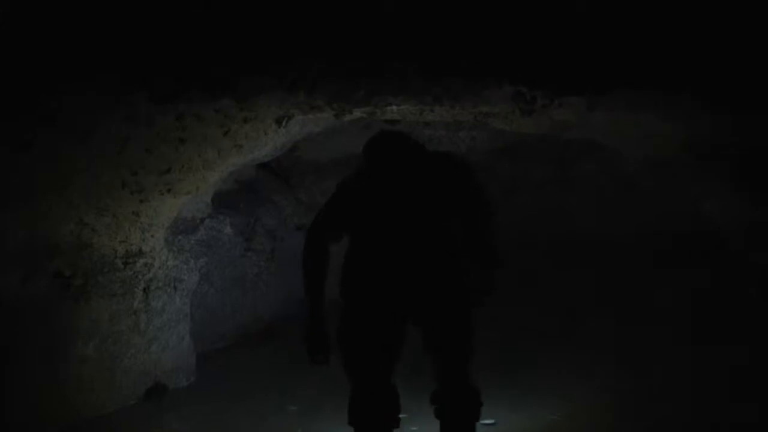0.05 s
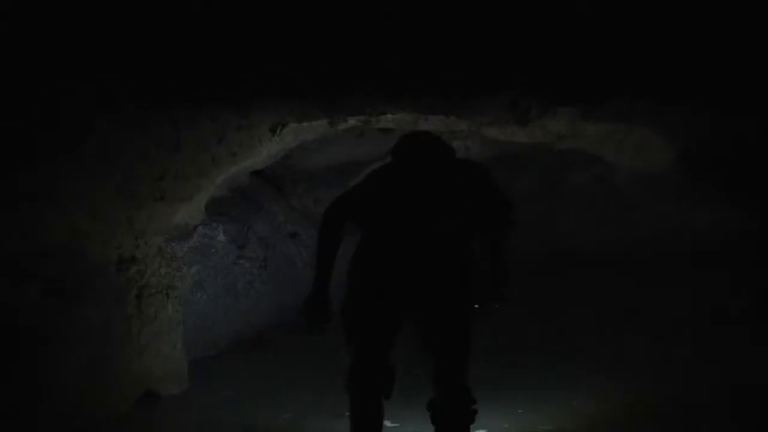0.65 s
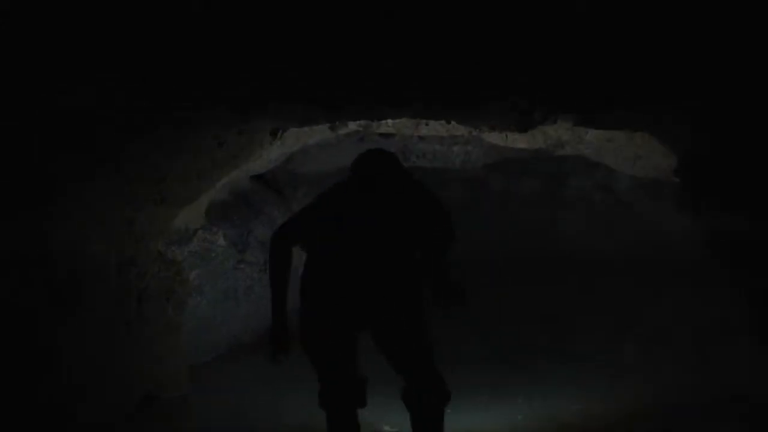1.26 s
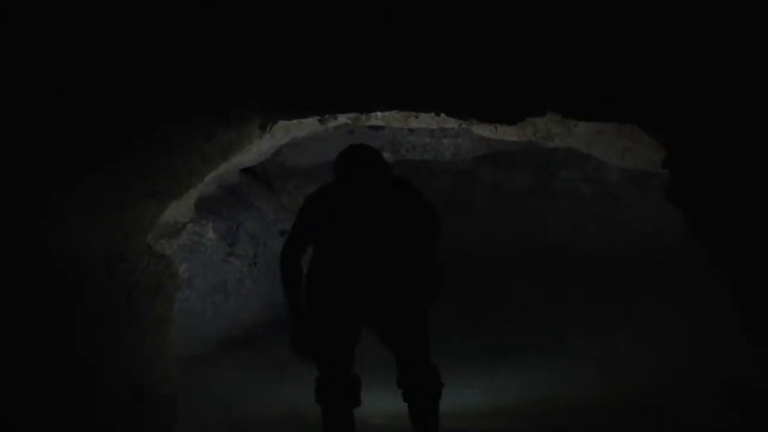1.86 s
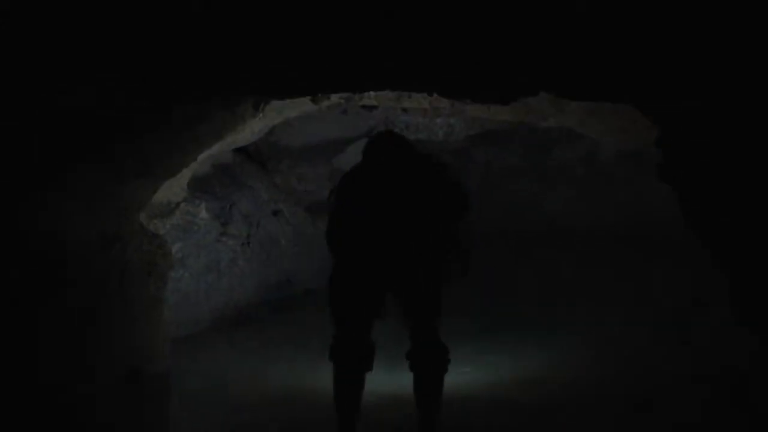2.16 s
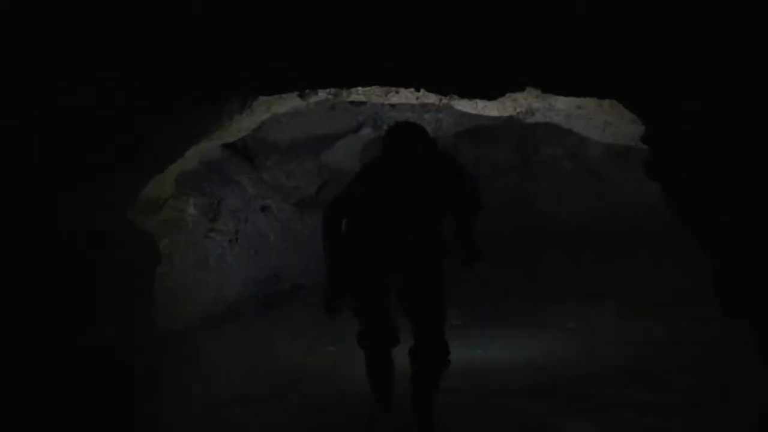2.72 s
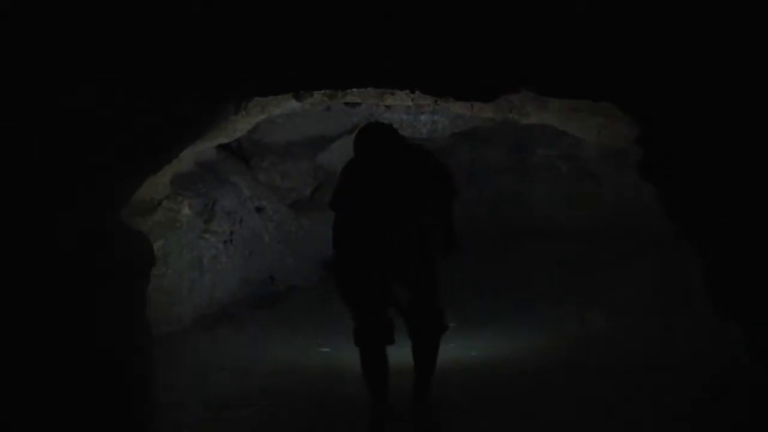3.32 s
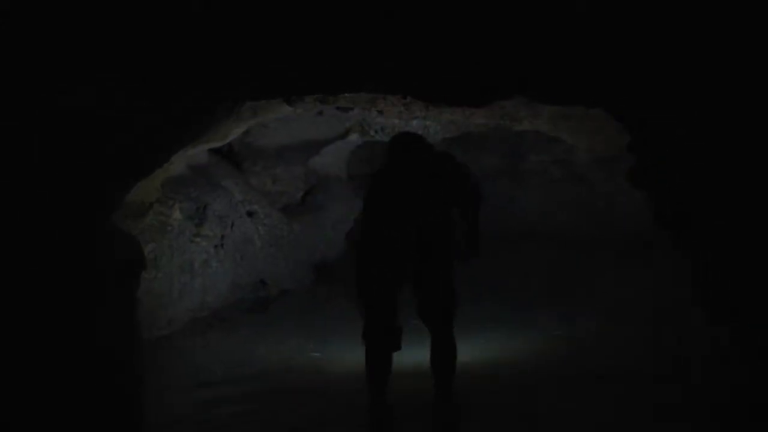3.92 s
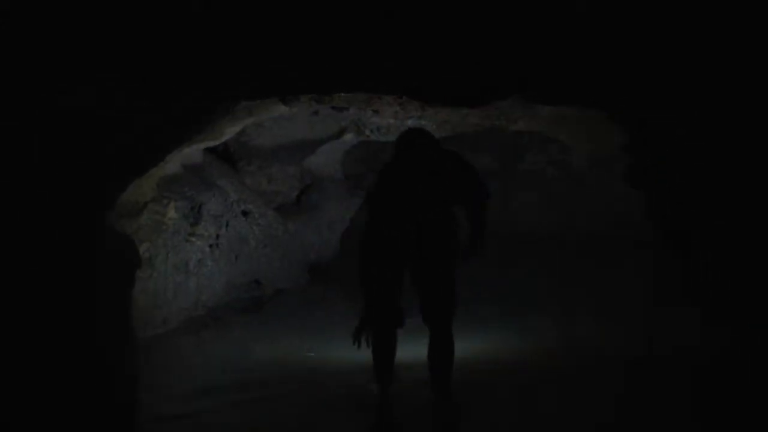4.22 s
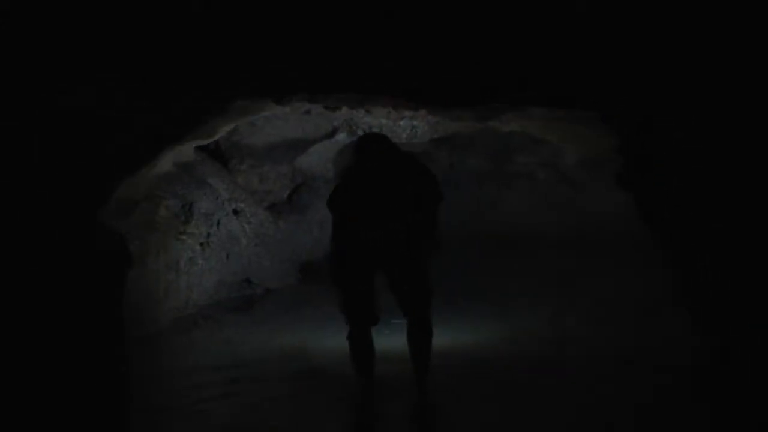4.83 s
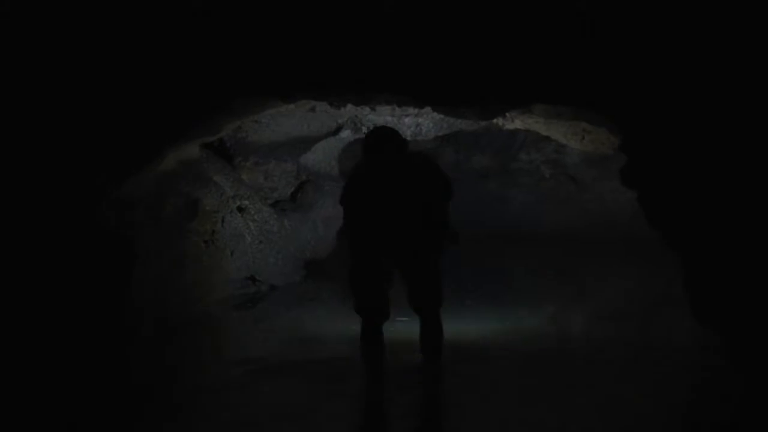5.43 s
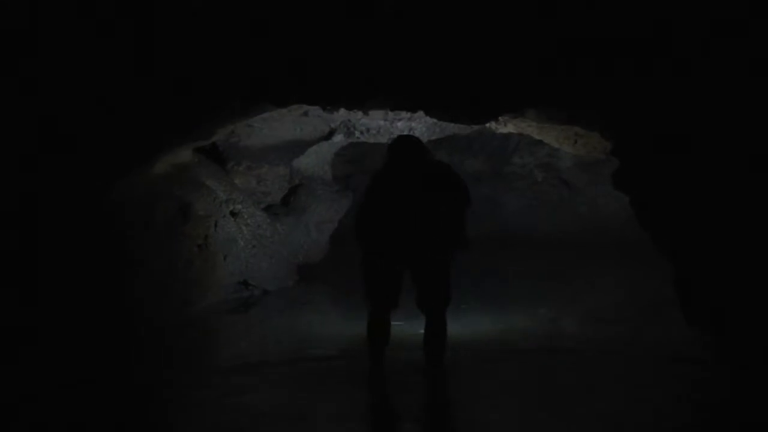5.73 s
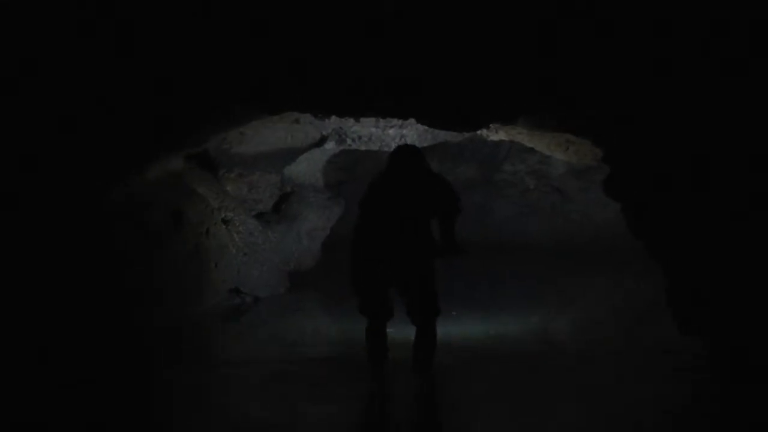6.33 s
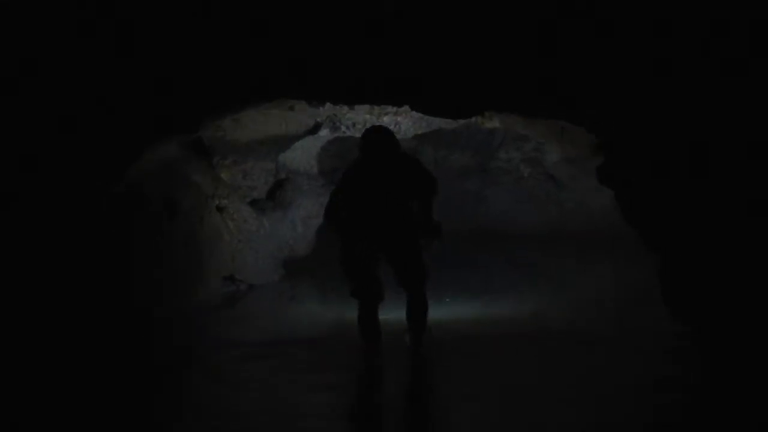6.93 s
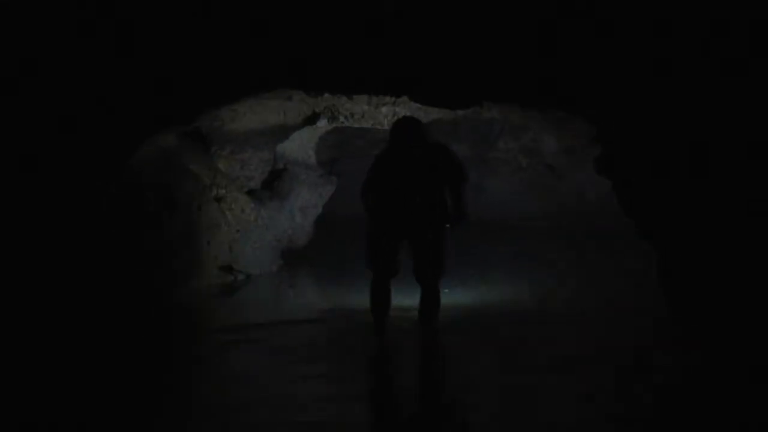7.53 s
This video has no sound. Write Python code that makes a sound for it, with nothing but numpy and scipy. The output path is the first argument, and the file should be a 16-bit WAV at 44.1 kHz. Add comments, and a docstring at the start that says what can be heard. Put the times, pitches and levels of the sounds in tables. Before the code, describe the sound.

Someone wades through ankle-deep water in a low cave, each steady stride gulping and splashing, with drips and short echoes.

```python
"""A low cave, ankle-deep water, one microphone close to the rock, which answers with short echoes.
Water slops and drips over a faint hiss and handling rumble. Half a second in, someone starts wading,
about one stride a second. Each leg drags air under: big bubbles gulp, small ones splash, spray patters
down and the water slops back. Single plops and spatters stand out; midway, soft low thuds join for
three seconds."""
import sys
import numpy as np
from scipy import signal
from scipy.fft import rfft, irfft, next_fast_len
from scipy.io import wavfile
from scipy.ndimage import uniform_filter1d

SR = 44100
rng = np.random.default_rng(int(sys.argv[2]) if len(sys.argv) > 2 else 0)


def digitize_waveform(pressure):
    """Quantize a signal to 16-bit integers and store it at the path in sys.argv[1].

    Rows of a 2-D input are taken as channels; values are limited to [-1, 1].
    """
    field = np.atleast_2d(pressure).T
    bounded = np.clip(field, -1, 1)
    quanta = np.round(bounded * 32767).astype(np.int16)
    wavfile.write(sys.argv[1], SR, quanta)


N = 338247
TOP_HZ = 15900

# Colour of the fine fizz of splashing: frequency_hz, density_db
FIZZ_COLOUR = [(150, -85), (300, 7.5), (600, 8.5), (1200, 2), (3000, 3.5), (5000, -5.5), (9000, -5.5),
               (12000, -12), (16000, -13)]
# A leg pushes through the water: start_s, swell_s, length_s, splash_db, gulp_over_splash_db,
# spray_over_splash_db, wash_db, entry_pitch_hz, deepest_after_s, deepest_pitch_hz
LEG_PUSHES = [(0.514, 0.069, 0.29, -53, -7.5, -7, -93, 695, 0.11, 476),
              (1.465, 0.11, 0.39, -48, -5, -7, -71.5, 638, 0.44, 324),
              (2.322, 0.27, 0.43, -48, -1.5, -9, -71, 439, 0.35, 358),
              (3.383, 0.13, 0.36, -48.5, -5, -9, -66, 684, 0.21, 322.6),
              (4.21, 0.23, 0.37, -46.5, -1, -5, -65, 731.5, .25, 399.6),
              (5.111, 0.164, .37, -49.5, 0, -6, -65.5, 356.4, 0.1682, 287.9),
              (5.927, 0.12, 0.42, -51, -4, -7.5, -66.5, 718, 0.22, 395),
              (6.893, 0.16, 0.37, -47.5, -2, -8.5, -64, 758, 0.3, 327)]


def from_db(db):
    return 10 ** (np.asarray(db) / 20)


def rms_one(x):
    return x / np.sqrt(np.mean(x ** 2) + 1e-20)


def curve(points):
    """Join (time_s, value) points with straight lines."""
    times, values = np.transpose(points)
    return np.interp(np.arange(N) / SR, times, values)


def add(out, start, sound):
    """Mix a short sound in at a sample position."""
    start = int(np.clip(start, 0, N - 1))
    out[start:start + len(sound)] += sound[:N - start]


def filtered(x, kind, hz):
    return signal.sosfilt(signal.butter(2, hz, kind, fs=SR, output="sos"), x)


def evened(x, span_s):
    """Hold the rms near 1 over a span; quicker swings remain."""
    width = int(span_s * SR)
    power = uniform_filter1d(uniform_filter1d(x ** 2, width), width)
    return x / np.sqrt(np.abs(power) + 1e-9)


def noise(colour):
    """Steady noise of a given colour, rms 1."""
    hz, db = np.transpose(colour)
    size = next_fast_len(N, True)
    bin_hz = np.maximum(np.fft.rfftfreq(size, 1 / SR), 1)
    gain = from_db(np.interp(np.log(bin_hz), np.log(hz), db))
    return rms_one(irfft(rfft(rng.standard_normal(size)) * gain, size)[:N])


def hiss_and_handling(lumps_db=3, lumps_hz=7):
    """A faint steady hiss and a lumpy low rumble of microphone handling."""
    # Colours of the hiss and the rumble: frequency_hz, density_db
    hiss_colour = [(20, -2.5), (90, -6.5), (180, -14), (400, -10.5), (1000, -19.5), (2700, -25),
                   (8300, -25.5), (16000, -28.5)]
    rumble_colour = [(20, 0.5), (60, -3.5), (110, -6), (200, -11.5), (400, -16.5), (2000, -58)]
    # Slow rise and fall of the handling rumble: time_s, level_db
    rumble_levels = [(0, -71), (1.35, -78), (1.6, -70), (2.2, -69.5), (3.1, -77), (3.3, -58.5),
                     (3.9, -61.5), (4.2, -66), (6.3, -66), (6.7, -67), (7.6, -68.5)]
    lumps = from_db(lumps_db * rms_one(filtered(rng.standard_normal(N), "low", lumps_hz)))
    rumble = from_db(curve(rumble_levels)) * rms_one(lumps * noise(rumble_colour))
    return rumble + from_db(-66.5) * noise(hiss_colour)


def bubble(hz, cycles, rise):
    """Trapped air rings, dying by 60 dB over its cycles; the pitch climbs as it nears the surface."""
    turns = np.arange(max(int(cycles / hz * SR), 8)) * hz / SR
    onset = 1 - np.exp(-turns / (.5 + .0037 * cycles))   # long rings start softly
    envelope = onset * from_db(-60 * turns / cycles)
    return envelope / envelope.max() * np.sin(2 * np.pi * turns * (1 + .5 * rise * turns / cycles))


def bubble_cloud(level_db, surge, per_s, low_hz, octaves, cycles, spread_db, rise, even_s):
    """Bubbles born at random, more and louder while the water surges; each glides up by its own amount."""
    births = np.flatnonzero(rng.random(N) < per_s * surge / SR)
    low_hz, out = np.broadcast_to(low_hz, N), np.zeros(N)
    for at, (pitch, size, damping, sign, depth) in zip(births, rng.random((len(births), 5))):
        hz = min(low_hz[at] * 2 ** (octaves * pitch), TOP_HZ)
        strength = surge[at] * from_db(-spread_db * np.log(size + .0017))
        ring = bubble(hz, cycles * 4 ** (damping - .5), 2 * depth * rise)
        add(out, at, np.sign(sign - .5) * strength * ring)
    return from_db(level_db) * evened(out, even_s)


def stirring(kind, shape, wash_offset_db=0, linger_s=0, slosh_s=.36):
    """Drive in dB for gulps, splash or spray: strides, the water ahead and behind, and sloshes add up."""
    # Water slops back: start_s, gulp_db, splash_db, spray_db, fall_db_per_s (negative swells)
    sloshes = [(0, -62.5, -65, -72, 58), (0.028, -57.5, -57, -62, 254), (0.877, -48, -51, -63.5, 186),
               (2.485, -52, -49.5, -62, 150), (3.24, -74.5, -73.5, -78, -42), (3.801, -56, -53, -58.5, 95),
               (4.358, -43.5, -44.5, -74, 255), (4.53, -44, -47, -68, 127), (4.83, -84, -67, -66.5, 9),
               (5.76, -65, -69.5, -76, -18), (6.157, -48, -48.5, -62, 252), (6.355, -60, -56.5, -61, 117),
               (6.898, -58, -50, -74.5, 200), (7.339, -52, -51.5, -78, 120), (7.654, -64, -48, -90, 148)]
    depth_db, sag_db_per_s, release_db_per_s = shape
    lead_db, lead_db_per_s, wash_db_per_s = -24, 72.5, 20
    t, power = np.arange(0, N, 32) / SR, 1e-10
    for start_s, swell_s, length_s, splash_db, gulp_db, spray_db, wash_db, *_ in LEG_PUSHES:
        age = t - start_s
        full_db = splash_db + {"gulp": gulp_db, "splash": 0, "spray": spray_db}[kind]
        lead = full_db + lead_db + lead_db_per_s * np.minimum(age, 0)   # water piles up ahead of the leg
        push = full_db - depth_db * np.clip(1 - age / swell_s, 0, 1)
        push -= sag_db_per_s * np.maximum(age - swell_s, 0)
        push -= release_db_per_s * np.maximum(age - length_s - linger_s, 0)
        wash = wash_db + wash_offset_db - wash_db_per_s * np.maximum(age - length_s, 0)
        power += from_db(np.where(age > 0, push, lead)) ** 2 + (age > length_s) * from_db(wash) ** 2
    for start_s, gulp_db, splash_db, spray_db, fall_db_per_s in sloshes:
        age = t - start_s
        start_db = {"gulp": gulp_db, "splash": splash_db, "spray": spray_db}[kind]
        slosh = from_db(start_db - fall_db_per_s * np.maximum(age, 0))
        power += (age >= 0) * (age < slosh_s) * slosh ** 2
    return curve(np.c_[t, 10 * np.log10(power)])


def hollow_pitch(refill_s=.207, refilled_hz=514):
    """Pitch of the largest bubbles: it sinks as the leg opens a hollow and climbs as the water closes it."""
    points = []
    for start_s, _, length_s, *_, entry_hz, deepest_s, deepest_hz in LEG_PUSHES:
        closed_s = start_s + length_s + refill_s
        points += [(start_s, entry_hz), (start_s + deepest_s, deepest_hz), (closed_s, refilled_hz)]
    return curve(points)


def surges(splash_db, per_s=55, decay_s=.011, size=1.7):
    """Little sheets of water slap down at random and die away; calm water barely surges."""
    stirred = np.minimum(from_db(.6 * (splash_db + 56)), 1)
    landings = rng.random(N) < per_s / SR
    kicks = landings * np.minimum(rng.exponential(1, N), 2) * size * stirred
    return 1 + signal.lfilter([1], [1, -np.exp(-1 / (decay_s * SR))], kicks + 1e-18)


def wading():
    """Glugs and gulps from the hollow behind the leg, splashing at its rim, spray and fine fizz on top."""
    # A stride swells, sags as the leg travels, then dies: depth_db, sag_db_per_s, release_db_per_s
    gulp_shape = (17, 7.5, 152)
    splash_shape = (12.5, 16, 90)
    spray_shape = (10.7, 13.5, 130)
    gulp_db = stirring("gulp", gulp_shape, wash_offset_db=-17, linger_s=.011)
    splash_db = stirring("splash", splash_shape)
    spray_db = stirring("spray", spray_shape, wash_offset_db=-2, linger_s=-.018)
    hollow_hz = hollow_pitch()
    push_db = np.clip(splash_db - splash_db.max(), -16, 0)
    rim_hz = 1007 * 2 ** (.025 * push_db)   # gentler water makes larger, lower bubbles
    surge = surges(splash_db)
    shower = np.sqrt(surge * surges(splash_db))   # thrown drops land partly in a rhythm of their own
    glugs = bubble_cloud(gulp_db, np.sqrt(surge), per_s=40, low_hz=hollow_hz, octaves=.563,
                         cycles=44.6, spread_db=6, rise=.448, even_s=.041)
    gulps = bubble_cloud(gulp_db, np.sqrt(surge), per_s=130, low_hz=hollow_hz, octaves=1.319,
                         cycles=25.4, spread_db=1.5, rise=.17, even_s=.022)
    splash = bubble_cloud(splash_db, shower, per_s=300, low_hz=rim_hz, octaves=2.25,
                          cycles=37.7, spread_db=3, rise=.429, even_s=.017)
    spray = bubble_cloud(spray_db, shower, per_s=430, low_hz=4220, octaves=1.63,
                         cycles=21, spread_db=3, rise=.034, even_s=.058)
    fizz = from_db(.39 * splash_db + .57 * spray_db) * evened(surge, span_s=.44) * noise(FIZZ_COLOUR)
    return (from_db(-5.5) * glugs + from_db(-1.5) * gulps + from_db(-3) * splash
            + from_db(-1.5) * spray + from_db(-5) * fizz)


def cave_echoes(x, t60_s=.22, tail_db=-5.5, step_s=.2, cut_hz=9800):
    """Close rock gives early echoes, some ringing and a short tail that changes as the walker moves."""
    # Reflections from roof and walls: delay_s, level_db
    reflections = [(0.012, -17), (0.02, -30)]
    # Resonances of the low passage: pitch_hz, width_hz, gain_db
    passage_modes = [(267, 15, 3), (547, 7.9, -4), (728, 94, -3.5)]
    t, hop, echoes = np.arange(SR // 4) / SR, int(step_s * SR), np.zeros(N)
    for start in range(-hop, N, hop):
        tail = rng.standard_normal(len(t)) * from_db(-60 * t / t60_s) * (t > .004)
        response = from_db(tail_db) * tail / np.linalg.norm(tail)
        for delay_s, db in reflections:
            response[int(delay_s * SR)] += from_db(db)
        span = np.arange(max(start, 0), min(start + 2 * hop, N))
        crossfade = np.sin(.5 * np.pi * (span - start) / hop)
        add(echoes, span[0], signal.fftconvolve(x[span] * crossfade, response))
    ringing = sum(from_db(db) * resonance(x, hz, width_hz) for hz, width_hz, db in passage_modes)
    return filtered(echoes, "low", cut_hz) + ringing


def resonance(x, hz, width_hz):
    """Two-pole band-pass, gain 1 at its peak."""
    radius = np.exp(-np.pi * width_hz / SR)
    feedback = [1, -2 * radius * np.cos(2 * np.pi * hz / SR), radius ** 2]
    return signal.lfilter(np.array([1, 0, -1]) * (1 - radius ** 2) / 2, feedback, x)


def plops(patter_db=-23, patter_s=.0074):
    """The largest bubbles and the drops nearest the microphone; small, hard ones scatter a brief patter."""
    # Single plops and drips: start_s, pitch_hz, peak_db, ring_cycles
    drops = [(0.029, 2210, -47, 41), (.036, 980, -52.5, 104), (.108, 5840, -43.5, 48),
             (.197, 1000, -54.5, 45), (0.489, 2660, -42, 28), (.541, 3420, -42.5, 39),
             (.568, 1640, -41, 20), (.583, 642, -44, 97), (0.611, 506, -44, 74), (.635, 2700, -36.5, 21),
             (.730, 2640, -40, 23), (.762, 5040, -34.5, 20), (.875, 479, -30.5, 45), (0.884, 1400, -44, 45),
             (0.895, 531, -39, 37), (1.285, 422, -53.5, 5.2), (1.316, 406, -49.5, 10),
             (1.471, 1830, -42, 68), (1.482, 3800, -38.5, 31), (1.543, 463, -41.5, 76),
             (1.561, 2580, -34, 15), (1.68, 3280, -30.5, 57), (1.691, 2580, -30, 27),
             (1.751, 1180, -37.5, 48), (1.753, 2650, -28.5, 10), (1.834, 327.5, -48, 73),
             (1.915, 390, -49.5, 66), (1.965, 478, -49.5, 46), (2.333, 460, -53, 82),
             (2.368, 1560, -47.5, 48), (2.543, 406.4, -43, 33.4), (2.609, 438, -36, 22),
             (2.745, 407, -45, 35), (3.028, 4020, -55.5, 43), (3.092, 2314, -55, 33),
             (3.408, 2686, -35.5, 13.4), (3.408, 956, -48.5, 76), (3.43, 3480, -33, 14),
             (3.467, 1050, -44.5, 77), (3.49, 506, -44, 37), (3.781, 1990, -40, 25.6),
             (4.229, 837, -44.5, 47), (4.268, 630, -45, 37), (4.359, 1330, -37, 52), (4.36, 674, -37, 18),
             (4.391, 2190, -31.5, 11), (4.446, 716.4, -33.5, 7.9), (4.828, 2480, -51.5, 31),
             (5.123, 352, -49, 47), (5.187, 2650, -39, 54.4), (5.272, 277, -47, 48),
             (5.441, 385, -40, 20.1), (5.482, 478.2, -42.5, 70), (5.611, 655, -46, 109),
             (5.825, 3008, -49.5, 55.5), (5.899, 1008, -40.5, 105), (6.06, 598, -43, 55.3),
             (6.172, 428, -39.5, 19), (6.193, 2055, -36, 16), (6.233, 4614, -28.5, 11.2),
             (6.266, 1062, -36, 48), (6.362, 2762, -40.5, 43), (6.454, 385.5, -51, 20.5),
             (6.486, 1793, -50, 42), (6.752, 2874, -51, 17.7), (6.867, 5694, -40.5, 17),
             (6.897, 1120, -41.5, 37), (6.954, 3434, -38.5, 28), (7.008, 9820, -33.5, 60.7),
             (7.111, 576, -37.5, 31), (7.137, 2406, -36.5, 39.2), (7.168, 364.4, -36.5, 40.7),
             (7.287, 4607, -36, 17.3), (7.338, 1425, -42, 47), (7.422, 1528, -42.5, 33.5)]
    rings, scatter, t = np.zeros(N), np.zeros(N), np.arange(SR // 8) / SR
    for start_s, hz, db, cycles in drops:
        add(rings, start_s * SR, from_db(db) * bubble(hz, cycles, rise=.21))
        hardness = min(hz / 2500, 1)
        add(scatter, start_s * SR, from_db(db + patter_db) * hardness * np.exp(-t / patter_s))
    return rings + scatter * rms_one(filtered(noise(FIZZ_COLOUR), "high", 1600))


def foot_slaps(swell_s=.0048):
    """The foot breaks the surface with a burst of fine splashing that swells and dies in a moment."""
    # A foot meets the water: start_s, level_db
    footfalls = [(0.488, -54.5), (0.531, -50), (1.47, -47.5), (5.188, -46)]
    bursts, t = np.zeros(N), np.arange(SR // 8) / SR
    for start_s, db in footfalls:
        add(bursts, start_s * SR, from_db(db) * t / swell_s * np.exp(1 - t / swell_s))
    return bursts * rms_one(filtered(noise(FIZZ_COLOUR), "high", 1700))


def spatters(low_hz=4900, octaves=1.14, cycles=16, over_s=.008, fade_db=9, count=9):
    """Thrown droplets land almost together: the first is the hardest, each rings at its own pitch."""
    # A handful of droplets lands: start_s, level_db
    handfuls = [(.533, -42), (.69, -45), (.702, -42.5), (1.692, -30.5), (2.536, -43), (3.802, -41),
                (4.479, -36), (5.157, -42), (5.277, -39), (5.442, -40.5), (6.032, -36.5), (6.212, -39.5),
                (7.067, -36), (7.207, -41), (7.412, -43.5)]
    out = np.zeros(N)
    for start_s, db in handfuls:
        for k, (pitch, late) in enumerate(rng.random((count, 2))):
            progress = (k + late) / count
            ring = bubble(low_hz * 2 ** (octaves * pitch), cycles, rise=late / 2)
            add(out, (start_s + over_s * progress ** 2) * SR, from_db(db - fade_db * progress) * ring)
    return out


def thuds():
    """Dull bumps of a few swings each."""
    # Soft low thuds: start_s, pitch_hz, peak_db
    bumps = [(3.385, 59.87, -50), (3.565, 99.4, -44.5), (3.682, 306.6, -40), (3.875, 107, -52.5),
             (4.39, 298.4, -37.5), (4.726, 84, -55.5), (5.585, 64, -51), (6.355, 198.4, -50.5)]
    out = np.zeros(N)
    for start_s, hz, db in bumps:
        add(out, start_s * SR, from_db(db) * bubble(hz, cycles=9, rise=0))
    return out


def scene():
    """The water and its echoes over hiss, handling rumble and thuds, in mono."""
    water = wading() + plops() + foot_slaps() + spatters()
    return (hiss_and_handling() + water + cave_echoes(water) + thuds())[None]


def record(dry):
    """The top end is cut steeply."""
    return signal.sosfilt(signal.ellip(12, .1, 80, TOP_HZ, fs=SR, output="sos"), dry)


dry = scene()
out = record(dry)
digitize_waveform(out)
```